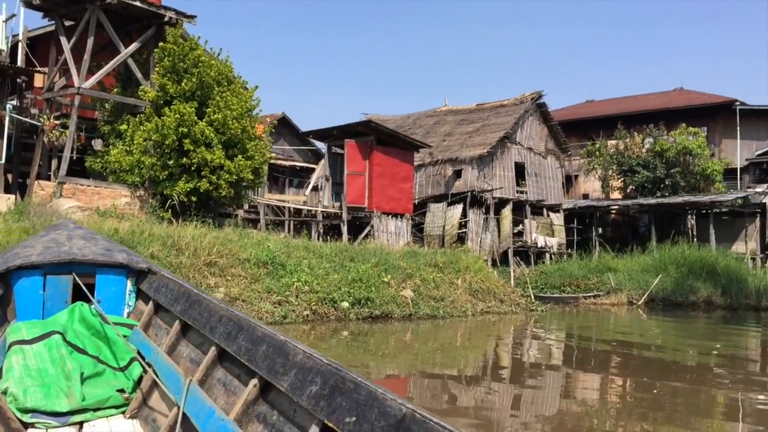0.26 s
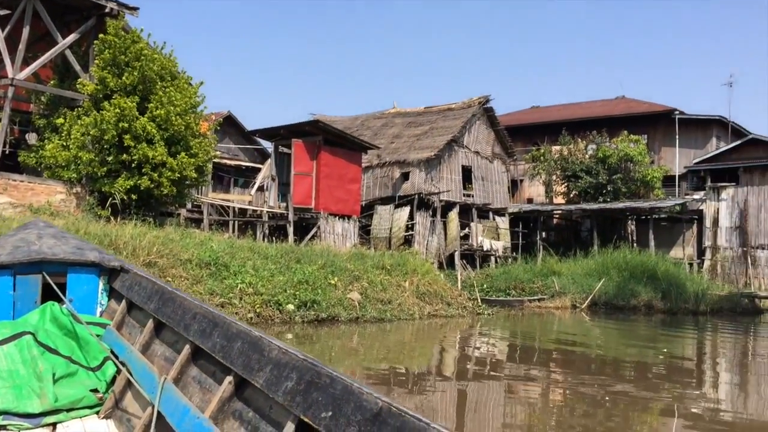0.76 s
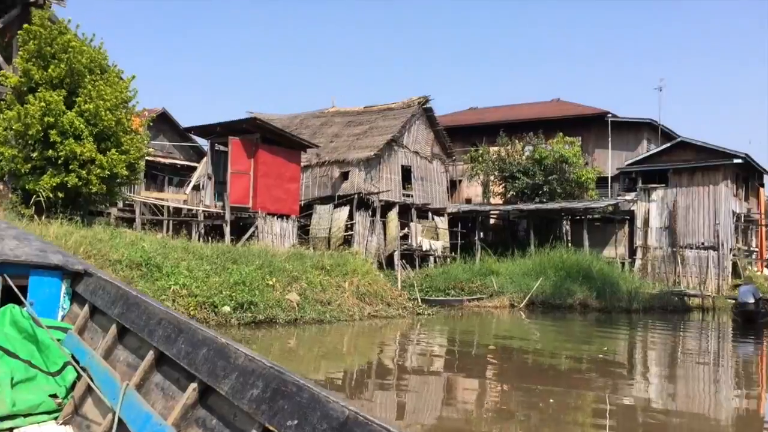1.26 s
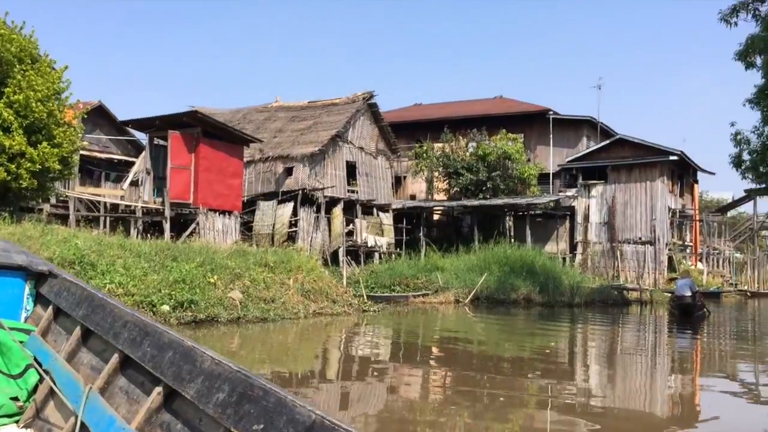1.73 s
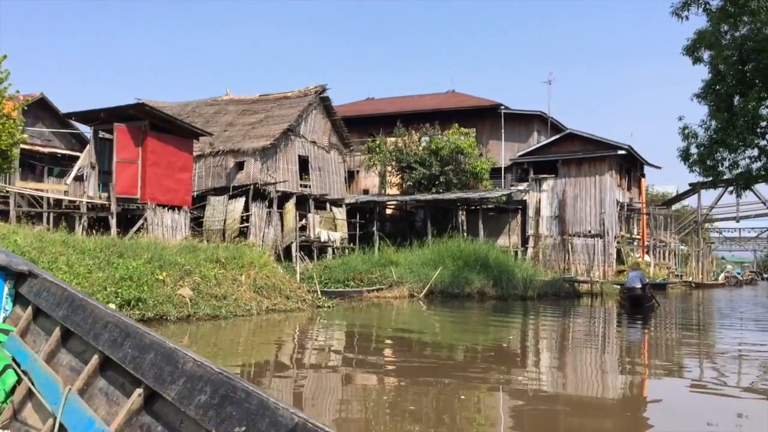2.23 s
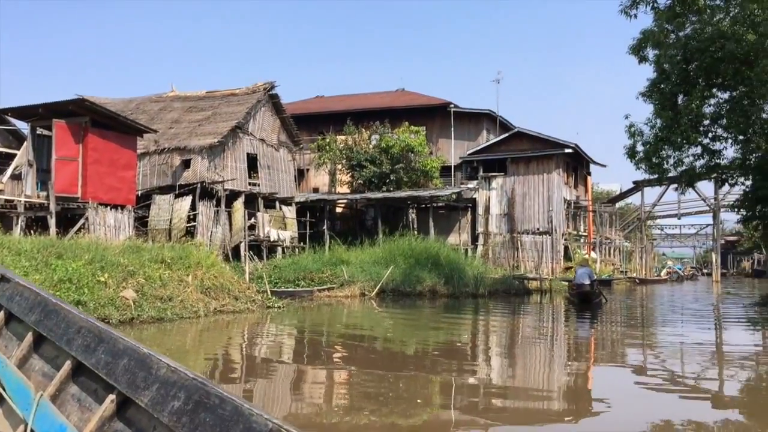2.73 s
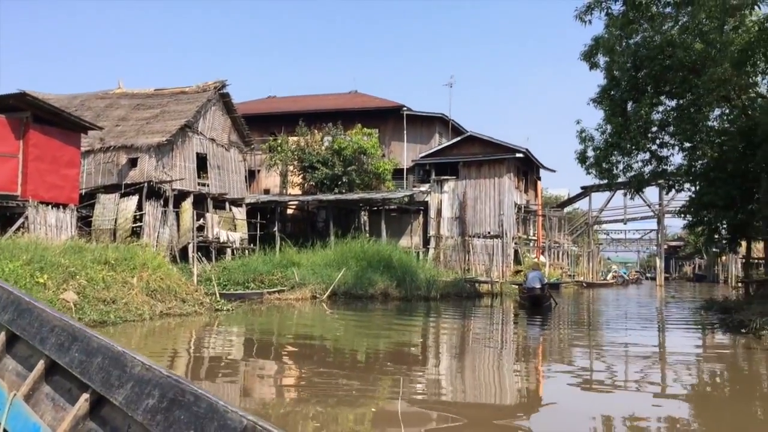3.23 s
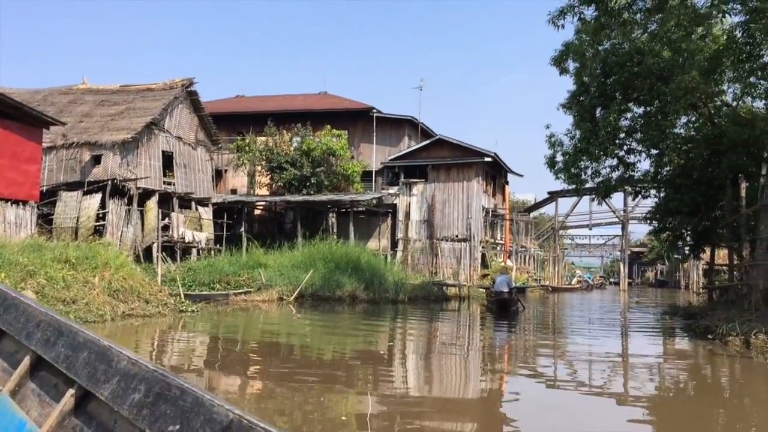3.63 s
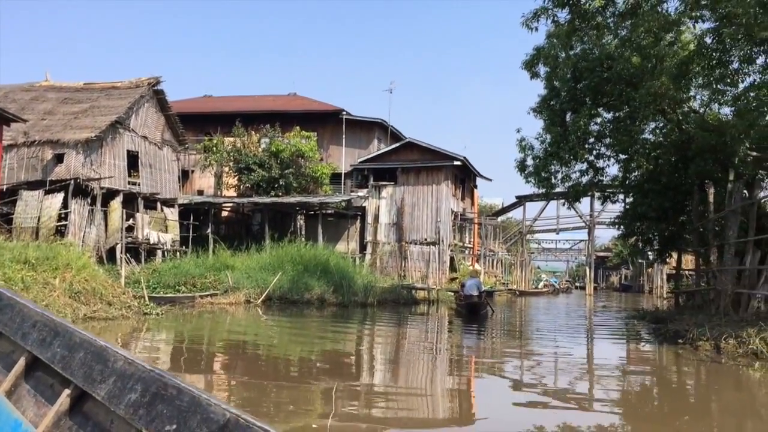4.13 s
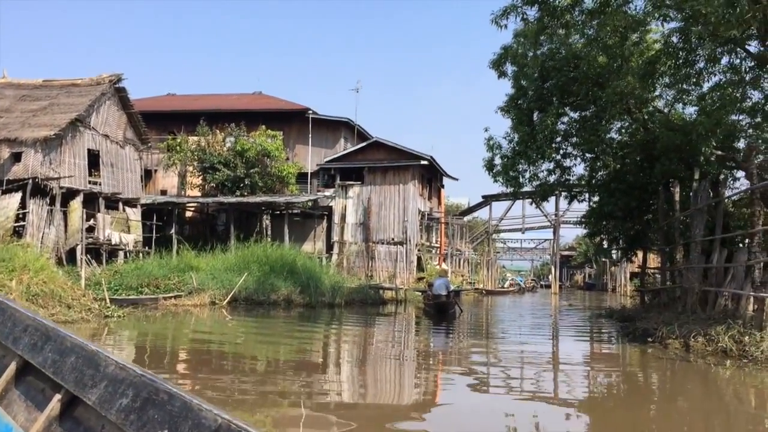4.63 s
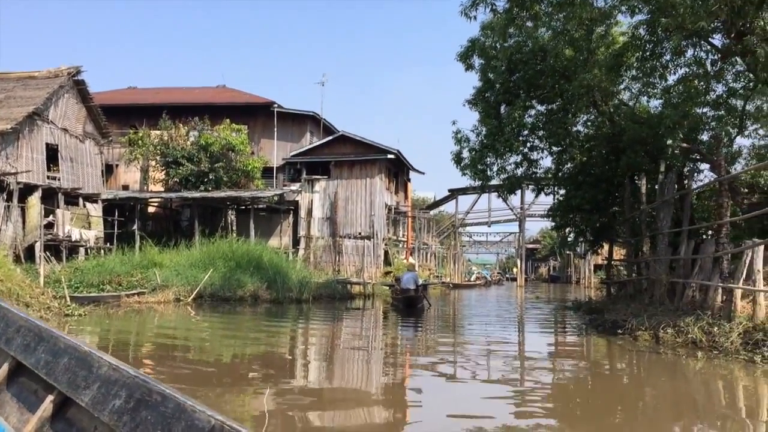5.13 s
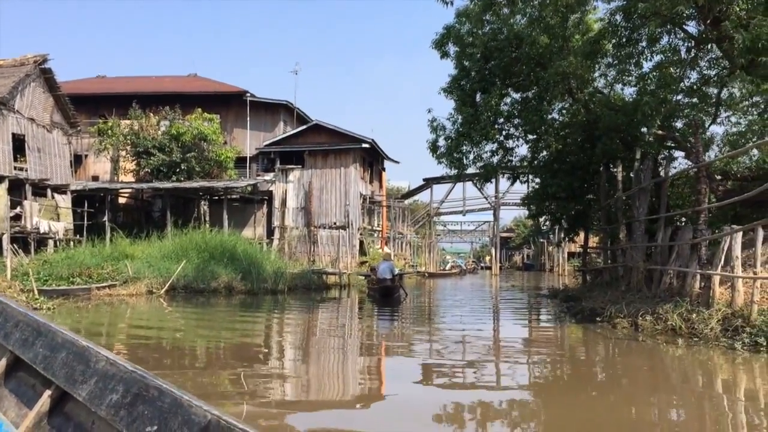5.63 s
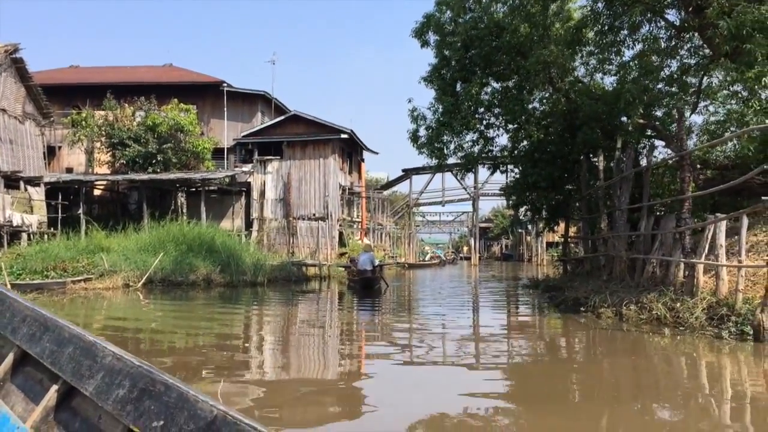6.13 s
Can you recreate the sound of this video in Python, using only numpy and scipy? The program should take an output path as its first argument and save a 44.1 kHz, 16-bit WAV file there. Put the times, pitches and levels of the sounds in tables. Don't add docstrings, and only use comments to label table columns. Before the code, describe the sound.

A one-cylinder diesel chugs continuously for just over six seconds, heard close from aboard a wooden boat in the open air. It fires nearly five times a second, slightly unevenly. Each firing gives several deep, quick blows through the hull, a hard knock in the block and a gritty, hollow puff in the exhaust pipe. Bright valve and injector ticks, dull rocker taps and thin clinks repeat between them over fine gear chatter and a steady, flickering wash. Exhaust pops and a buzzing metal sheet stand out around 0.6 to 0.9 seconds. From about 2.2 to 3.3 the beat slackens and the thumps weaken at first; near 3.3 to 3.8 harder firings shake the sheet, with sharp snaps. The pace then picks up, with strong pops around 4.4, 5 and 5.4 and looser, clattering rockers towards 6. A low floor-board hum swells now and then. The engine is still running at the end.

```python
import sys
import numpy as np
from scipy import signal
from scipy.fft import rfft, irfft, next_fast_len
from scipy.io import wavfile
from scipy.ndimage import uniform_filter1d

SR = 44100
rng = np.random.default_rng(int(sys.argv[2]) if len(sys.argv) > 2 else 0)


def volts_from_decibels(level):
    exponent = np.asarray(level, float) / 20
    return 10 ** exponent


def pcm_store(signal):
    levels = np.round(np.clip(np.atleast_2d(signal), -1, 1) * 32767)
    wavfile.write(sys.argv[1], SR, levels.astype(np.int16).T)


N = 280917


def evened(x):
    return x / np.sqrt(np.mean(x ** 2) + 1e-20)


def clicks(s, size):
    train = np.zeros(N)
    at = np.round(np.asarray(s) * SR).astype(int)
    inside = (at >= 0) & (at < N)
    np.add.at(train, at[inside], (size * np.ones(len(at)))[inside])
    return train


def ring(x, modes, rise=0.00012):
    t = np.arange(SR // 4) / SR
    body = sum(volts_from_decibels(db) * np.exp(-np.pi * width * t) * np.cos(2 * np.pi * hz * t) for hz, width, db in modes)
    return signal.oaconvolve(x, body * (1 - np.exp(-t / rise)))[:N]


def ring_apart(x, envelope, modes, rise):
    return sum(ring(np.roll(x, k * SR // 7) * envelope, [mode], rise) for k, mode in enumerate(modes))


def coloured(x, tone):
    f, db = np.transpose(tone)
    size = next_fast_len(N)
    hz = np.fft.rfftfreq(size, 1 / SR)
    gain = volts_from_decibels(np.interp(np.log(hz + 1), np.log(f), db))
    return evened(irfft(rfft(x, size) * gain, size)[:N])


def grit(per_s, spread_db):
    size = volts_from_decibels(spread_db * np.minimum(rng.exponential(1, N), 5))
    sign = rng.choice([-1., 1.], N)
    return evened(size * sign * (rng.random(N) < per_s / SR))


def pings(rows, rise, fall, sag=0.):
    out, t = np.zeros(N), np.arange(SR // 30) / SR
    turns = t + sag * fall * (1 - np.exp(-t / fall))
    shape = (1 - np.exp(-t / rise)) * np.exp(-t / fall)
    for s, db, hz in rows:
        part = out[round(s * SR):][:len(t)]
        part += (volts_from_decibels(db) * shape * np.sin(2 * np.pi * hz * turns))[:len(part)]
    return out


def bursts(rows, noise, rise, fall):
    s, db = np.transpose(rows)[:2]
    t = np.arange(SR // 20) / SR
    shape = (1 - np.exp(-t / rise)) * np.exp(-t / fall)
    return noise * signal.oaconvolve(clicks(s, volts_from_decibels(db)), shape)[:N]


# start in seconds, thump in dB, bark in dB, exhaust puff in dB.
FIRINGS = [(0.027, -23, -31, -49), (0.25, -40, -32, -54), (0.48, -33.5, -32, -48.5),
           (0.696, -31, -36, -48.5), (0.912, -31, -32.5, -42), (1.124, -30, -32, -51),
           (1.327, -30, -33, -48), (1.54, -29, -30, -46), (1.742, -28.5, -32.5, -46.5),
           (1.944, -34.5, -36.5, -56), (2.153, -38, -37.5, -50.5), (2.369, -36, -35, -50),
           (2.6, -49, -35, -51), (2.841, -34.5, -34, -54), (3.097, -30, -34.5, -54.5),
           (3.358, -35, -28.5, -45), (3.602, -32, -29, -40.5), (3.818, -32.5, -30.5, -40),
           (4.028, -33, -33.5, -48.5), (4.23, -27.5, -34, -51.5), (4.437, -30.5, -29, -44.5),
           (4.636, -36, -33.5, -50.5), (4.837, -32, -34.5, -48), (5.042, -30.5, -31, -45.5),
           (5.246, -35.5, -35, -50), (5.453, -33, -29, -43), (5.656, -30.5, -33.5, -48),
           (5.856, -36.5, -35, -51.5), (6.07, -31, -30.5, -45), (6.285, -48, -27.5, -41.5)]
USUAL_PUFF_DB = -48


def puffs(size, start, hold, rise, fall):
    t = np.arange(SR // 3) / SR
    shape = (1 - np.exp(-t / rise)) * np.exp(-np.maximum(t - hold, 0) / fall)
    early = SR // 10
    train = np.zeros(N + early)
    train[np.round((np.transpose(FIRINGS)[0] + start) * SR).astype(int) + early] = size
    return signal.oaconvolve(train, shape)[early:early + N]


def load_curve(db, follows):
    s, puff_db = np.transpose(FIRINGS)[[0, 3]]
    return volts_from_decibels(db + follows * np.interp(np.arange(N) / SR, s, puff_db - USUAL_PUFF_DB))


def cycle(slots, follows=0., slip_s=0.00085):
    s, puff_db = np.transpose(FIRINGS)[[0, 3], :, None]
    late, db, hz, hz_spread, db_spread = np.transpose(slots)
    uneven = np.clip(rng.standard_normal((len(FIRINGS), len(slots), 3)), -2, 2)
    a, b, c = np.moveaxis(uneven, -1, 0)
    at = s + late + slip_s * a
    level_db = db + follows * (puff_db - USUAL_PUFF_DB) + db_spread * b
    rows = np.array([at, level_db, hz * (1 + hz_spread * c)]).reshape(3, -1).T
    return rows[rows[:, 0] > 0]


# seconds from the firing, factor on the thump, factor on the bark.
BLOWS = [
    (-.063, -4.3, -9),
    (-.0414, 3.8, -.4),
    (-.0114, -.9, 4.1),
    (.036, .75, .9),
]
# pitch in Hz, width in Hz, level in dB.
THUMP_MODES = [(63.5, 12.5, 0), (84.5, 11, 3)]
# pitch in Hz, width in Hz, level in dB.
BARK_MODES = [(116, 14, 0), (152, 11, -15), (213, 17, -15)]
# frequency in Hz, level in dB per Hz.
SHAKE_TONE = [(25, -34.5), (45, -2), (60, -2.5), (80, 2), (100, -11), (125, 2), (160, -4.5), (210, -9),
              (255, -13), (310, -17.5), (390, -54.5), (520, -37), (900, -77.5)]


def hull():
    s, thump_db, bark_db = np.transpose(FIRINGS)[:3, :, None]
    late, on_thump, on_bark = np.transpose(BLOWS)
    slip, uneven = np.moveaxis(rng.standard_normal((len(FIRINGS), len(BLOWS), 2)), -1, 0)
    at = (s + late + .0009 * slip).ravel()
    thump_size = (on_thump * volts_from_decibels(thump_db + 1.5 * uneven)).ravel()
    bark_size = (on_bark * volts_from_decibels(bark_db - 1.5 * uneven)).ravel()
    thump = ring(clicks(at, thump_size), THUMP_MODES, rise=.03)
    bark = ring(clicks(at, bark_size), BARK_MODES, rise=.03)
    surge = volts_from_decibels(-3.5) * puffs(volts_from_decibels(bark_db[:, 0]), start=-.08, hold=0.095, rise=0.0027, fall=0.019)
    steady = volts_from_decibels(3.0) * load_curve(db=-40.5, follows=0.26)
    shake = coloured(rng.standard_normal(N), SHAKE_TONE) * (steady + surge)
    return volts_from_decibels(1.5) * thump + volts_from_decibels(.5) * bark + shake


# time of the top in seconds, level in dB.
HUM_SWELLS = [(0.71, -35), (1.02, -35), (1.329, -42.5), (1.51, -35.5), (1.83, -36.5), (2.69, -36),
              (2.998, -35), (3.32, -36.5), (4.702, -32), (6.05, -37.5), (6.25, -37.5)]


def board():
    hum_hz, hum_db, swell_s = 210.1, -44.5, .033
    quick, slow, flutter = (evened(uniform_filter1d(rng.standard_normal(N), n)) for n in (900, 6000, 900))
    turns = np.cumsum(hum_hz * (1 + 0.04155 * quick + 0.04835 * slow)) / SR
    t = np.arange(N) / SR
    swells = sum(volts_from_decibels(db) * np.exp(-.5 * ((t - s) / swell_s) ** 2) for s, db in HUM_SWELLS)
    return (volts_from_decibels(hum_db) + swells) * volts_from_decibels(-3.0 + 3.2 * flutter) * np.sin(2 * np.pi * turns)


# frequency in Hz, level in dB per Hz.
WASH_TONE = [(200, -25), (330, 2), (480, -8.5), (610, -3), (1000, -9), (1300, -11), (1700, -12),
             (2300, -15.5), (2700, -21.5), (3800, -22), (4400, -27), (5000, -36), (6500, -37),
             (9000, -48.5), (15300, -51.5)]
WASH_DB, WASH_FOLLOWS = -55, 0.26


def wash():
    swell = 1 + puffs(1.0, start=-0.062, hold=0.071, rise=0.0021, fall=0.022)
    flicker_db = 1.1 * evened(uniform_filter1d(rng.standard_normal(N), 500))
    bed = rng.standard_normal(N) + 0.15 * grit(per_s=1100, spread_db=-1.5)
    level = volts_from_decibels(2.0 + flicker_db) * load_curve(WASH_DB, WASH_FOLLOWS) * swell
    return coloured(bed, WASH_TONE) * level


# pitch in Hz, width in Hz, level in dB.
PIPE_MODES = [(578, 94.5, 8.5), (736.7, 51, 1.5), (944, 77, 1), (1087, 98, 1.5), (1285, 53, -9.5)]
# start in seconds, peak in dB.
POPS = [(0.248, -31), (0.388, -35), (0.627, -24), (0.882, -51), (1.463, -36), (1.724, -35), (3.579, -31),
        (4.359, -26), (4.392, -29), (4.961, -28), (5.369, -30.5), (5.425, -28.5), (5.72, -33.5),
        (5.896, -30), (6.021, -26)]
# seconds from the firing, peak in dB, two unused, level spread in dB.
VALVE_POP = [
    (-0.095, -43, 0, 0, 7.5),
]


def exhaust():
    flow = puffs(volts_from_decibels(np.transpose(FIRINGS)[3]), start=-0.085, hold=0.095, rise=0.0053, fall=0.052)
    gas = 0.72 * grit(per_s=500, spread_db=4.0) + 0.39 * rng.standard_normal(N)
    puffing = evened(ring_apart(gas, 1, PIPE_MODES, rise=0.0012)) * flow
    pops = np.vstack([POPS, cycle(VALVE_POP, follows=0.69, slip_s=.004)[:, :2]])
    s, db = pops.T
    breath = bursts(pops, rng.standard_normal(N), rise=0.00056, fall=0.0049)
    pop = clicks(s - .003, volts_from_decibels(db)) + volts_from_decibels(-18) * breath
    return volts_from_decibels(-3.0) * puffing + volts_from_decibels(-7.0) * ring(pop, PIPE_MODES, rise=0.0048)


# start in seconds, peak in dB.
RATTLES = [(0.0004, -64), (0.431, -55.5), (0.6275, -59), (0.674, -45), (0.875, -48.5), (0.886, -46.5),
           (1.086, -59), (1.2604, -54), (1.466, -51.5), (1.5504, -56), (1.691, -62), (2.332, -59),
           (3.335, -43.5), (3.5543, -59.5), (3.5728, -40), (3.794, -37.5), (4.3904, -43.5), (5.3894, -53),
           (5.9853, -53), (6.023, -51.5), (6.1933, -55), (6.2547, -47)]
# seconds later, level in dB.
BOUNCES = [
    (0, 4),
    (.045, -3),
    (.086, -6.5),
]
# pitch in Hz, width in Hz, level in dB.
SHEET_MODES = [(6330, 97, -5.5), (6700, 100, -10), (7860, 87, -4.5), (8600, 75, -7.5), (9000, 90, -18),
               (9050, 73, -9)]
# frequency in Hz, level in dB per Hz.
BUZZ_TONE = [(1500, 6), (2200, -2.5), (3800, -2), (5000, -17.5), (6300, -9), (7500, -21.5), (9000, -22.5),
             (12000, -19), (15300, -32)]


def sheet():
    buzz_t60 = 0.24
    hiss = coloured(rng.standard_normal(N) + .5 * grit(per_s=2700, spread_db=-0.5), BUZZ_TONE)
    dull = signal.sosfilt(signal.butter(2, 8500, fs=SR, output="sos"), hiss)
    touches = grit(per_s=900, spread_db=-2.0)
    modes = np.array([ring(touches, [mode]) for mode in SHEET_MODES])
    modes = modes / np.std(modes.sum(0))
    strikes = [(s + late, db + less) for s, db in RATTLES for late, less in BOUNCES]
    spots = volts_from_decibels(4 * rng.standard_normal((len(strikes), len(SHEET_MODES))))
    out, t = np.zeros(N), np.arange(SR // 2) / SR
    for (s, db), spot in zip(strikes, spots):
        start = round(s * SR)
        part = slice(start, min(N, start + len(t)))
        fade = volts_from_decibels(-60 * t[:len(out[part])] / buzz_t60)
        buzz = dull[part] + volts_from_decibels(-23) * spot @ modes[:, part]
        treble = (hiss - dull)[part]
        out[part] += volts_from_decibels(db - 4.5) * (fade * buzz + fade ** 1.58 * treble)
    return out


# start in seconds, peak in dB, ring in Hz.
LOUD_SNAPS = [(0.0253, -46, 6870), (0.6883, -49, 6700), (0.9043, -51, 6370), (1.1044, -50, 6650),
              (1.1214, -56, 5970), (1.3159, -46, 6680), (3.0814, -51, 12700), (3.3444, -48, 8260),
              (3.792, -41.5, 6400), (4.4014, -53, 8200), (5.9439, -48.5, 6820)]
# seconds from the firing, peak in dB, ring in Hz, pitch spread 0-1, spread in dB.
FIRING_SNAP = [
    (0.0041, -68, 2400, 0.1, 8),
]


def snaps():
    crack = coloured(rng.standard_normal(N), [(3500, -9.5), (6500, 1.5), (12000, -8), (15300, -18.0)])
    rows = np.vstack([LOUD_SNAPS, cycle(FIRING_SNAP)])
    rings = volts_from_decibels(2.0) * pings(rows, rise=0.00043, fall=.0015)
    return rings + volts_from_decibels(-5) * bursts(rows, crack, rise=.0003, fall=0.0031)


# pitch in Hz, width in Hz, level in dB.
BLOCK_MODES = [(923, 50, 1.5), (1555, 81, 5), (1719, 98, 6.5), (1913, 75, -1.5), (2250, 59, -4.5)]
# firing in seconds, change in dB, lateness in seconds.
ODD_KNOCKS = [(.25, 8, 0), (.48, 6.5, 0.00052), (.696, 10.5, 0), (.911, 2, 0.0051), (1.329, -5, 0.017),
              (1.743, -11, 0), (2.6, 0.5, 0.0032), (3.098, 6.5, 0), (3.602, -3.5, 0.0012), (5.043, 3.5, 0),
              (5.246, -14, 0.0031), (5.656, 0, 0)]


def knock():
    usual_cycle_s, knock_db, db_per_slow_s = .21, -55.5, 307.5
    s, puff_db = np.transpose(FIRINGS)[[0, 3]]
    slow_s = np.minimum(np.gradient(s) - usual_cycle_s, .02)
    odd_db, late = sum(np.outer([db, lag], abs(s - at) < .05) for at, db, lag in ODD_KNOCKS)
    size = volts_from_decibels(knock_db + puff_db - USUAL_PUFF_DB + db_per_slow_s * slow_s + odd_db)
    hits = clicks(s - .005 + late, size) + volts_from_decibels(-8.5) * clicks(s - .04, size)
    clatter = grit(per_s=700, spread_db=3.5)
    swell = puffs(size, start=-0.051, hold=0.046, rise=0.046, fall=0.033)
    clattering = ring_apart(clatter, swell, BLOCK_MODES, rise=.001) / 12
    return volts_from_decibels(13.0) * ring(hits, BLOCK_MODES, rise=0.0032) + volts_from_decibels(-2.0) * clattering


# pitch in Hz, width in Hz, level in dB.
ROCKER_MODES = [(2305, 35, -7), (2483, 273, 5.5), (2860, 134, 0), (3500, 120, -22.5), (4120, 180, -16)]
# time in seconds, factor on tap pitch, looseness in dB (chatter up, taps down).
SEATING = [
    (0, 1.07, -1),
    (1.65, 1.09, 0.5),
    (1.9, .98, 0.5),
    (3.1, .97, -0.5),
    (4.4, 0.88, 1),
    (4.8, 1.2, 3),
    (5.201, 1.1, 3),
    (6.4, 0.87, 5),
]


def gear_chatter(scratch):
    at, _, loose_db = np.transpose(SEATING)
    teeth = grit(per_s=180, spread_db=6.5)
    chatter = evened(ring_apart(teeth, 1, ROCKER_MODES + BLOCK_MODES[1:], rise=0.0011))
    rubbing = 0.6 * np.roll(scratch, SR)
    loose = volts_from_decibels(-10.5 + np.interp(np.arange(N) / SR, at, loose_db))
    return loose * (chatter + rubbing) * load_curve(WASH_DB, WASH_FOLLOWS)


# seconds from the firing, peak in dB, ring in Hz, pitch spread 0-1, spread in dB.
TAPS = [
    (-.071, -45, 2540, 0.1, -3),
    (-.011, -53.5, 2380, 0.1, 0.5),
    (.0325, -43, 2490, 0.11, 4),
    (.0795, -44.5, 2490, .06, 2),
    (.112, -46, 2440, 0.06, -4),
]


def rocker_taps(scratch):
    at, seat, loose_db = np.transpose(SEATING)
    s, db, hz = cycle(TAPS).T
    rows = np.c_[s, db - np.interp(s, at, loose_db), hz * np.interp(s, at, seat)]
    taps = volts_from_decibels(1.0) * pings(rows, rise=0.0037, fall=0.0048, sag=0.088)
    return taps + volts_from_decibels(-2.5) * bursts(rows, scratch, rise=0.0028, fall=0.0067)


# seconds from the firing, peak in dB, ring in Hz, pitch spread 0-1, spread in dB.
TICKS = [
    (-.069, -57.5, 3540, .015, 1),
    (-.0028, -40.5, 3540, 0, 0.9),
    (.031, -55, 3500, 0.04, 3),
]
# pitch in Hz, width in Hz, level in dB.
TICK_MODES = [(3400, 140, -22), (4100, 92, -13), (6870, 140, -19)]
# start in seconds, peak in dB.
EARLY_TICKS = [(0.442, -42.5), (0.6739, -37.5), (0.8839, -38), (1.0859, -45), (1.292, -45), (1.5, -37.5),
               (2.1136, -46), (2.3315, -42.5), (2.5282, -53), (2.5611, -44.5), (2.7684, -49), (2.8, -43.5),
               (3.3335, -42), (3.5698, -44), (3.7534, -41.5), (3.7913, -48), (5.3792, -44), (5.9968, -46),
               (6.2117, -44), (4.4018, -42.5), (4.5999, -46.5), (6.2487, -42)]
# firing in seconds, level in dB.
SLACK = [
    (.48, -7),
    (.696, -7),
    (.911, -10),
    (1.943, -30),
    (3.602, -13),
    (4.028, -17),
    (4.232, -22),
    (5.246, -28),
    (5.857, -25),
]


def valve_ticks(scratch):
    injector_hz = 3540
    regular = cycle(TICKS, slip_s=0.00052)
    slack_db = sum(db * (abs(regular[:, 0] - s) < .02) for s, db in SLACK)
    regular[:, 1] += slack_db
    rows = np.vstack([regular, [(s, db, injector_hz) for s, db in EARLY_TICKS]])
    s, db, _ = rows.T
    ticks = volts_from_decibels(4) * pings(rows, rise=0.002, fall=0.0036, sag=0.031)
    side = ring(clicks(s, volts_from_decibels(db)), TICK_MODES, rise=0.0018)
    scrape = volts_from_decibels(-20.0) * bursts(rows, coloured(scratch, BUZZ_TONE), rise=0.0013, fall=0.0046)
    return ticks + side + scrape


# seconds from the firing, peak in dB, ring in Hz, pitch spread 0-1, spread in dB.
CLINKS = [
    (-.037, -55, 4600, 0.08, 2.5),
    (-.003, -62.5, 4566, 0, -0.5),
]
# start in seconds, peak in dB, ring in Hz.
LOUD_CLINKS = [(0.7035, -50, 4650), (0.8999, -48, 4650), (3.0594, -44, 4150), (3.0814, -46, 4500),
               (3.3223, -45, 4750), (4.028, -42.5, 4070), (4.4009, -45, 4500), (5.0045, -44, 4540),
               (5.245, -54, 4600), (5.4141, -44, 4700), (5.6158, -48, 4610), (6.0287, -42, 4470),
               (6.2437, -48, 4770)]


def clinks():
    rows = np.vstack([LOUD_CLINKS, cycle(CLINKS, follows=0.75)])
    return volts_from_decibels(1.5) * pings(rows, rise=.0015, fall=.0028, sag=.03)


def valve_gear():
    scratch = evened(ring(rng.standard_normal(N), ROCKER_MODES))
    return gear_chatter(scratch) + rocker_taps(scratch) + valve_ticks(scratch) + clinks()


def scene():
    return (hull() + board() + wash() + exhaust() + sheet() + snaps() + knock() + valve_gear())[None]


def low_pass(x):
    return signal.sosfilt(signal.butter(12, 15290, fs=SR, output="sos"), x)


def record(dry):
    cut = signal.sosfiltfilt(signal.butter(2, 33, "highpass", fs=SR, output="sos"), dry)
    power_db = 10 * np.log10(abs(uniform_filter1d(cut ** 2, 900)) + 1e-12)
    over_db = uniform_filter1d(np.maximum(power_db + 26, 0), 500)
    held = cut / volts_from_decibels(.6 * over_db)
    return low_pass(held)


dry = scene()
out = record(dry)
pcm_store(out)
```